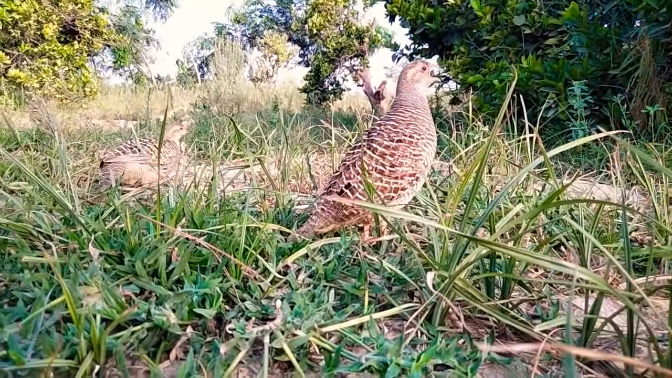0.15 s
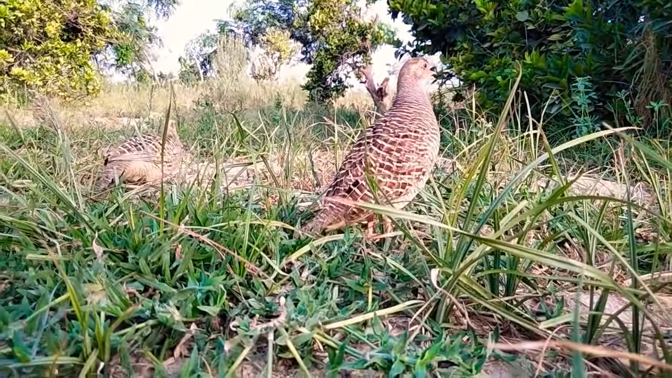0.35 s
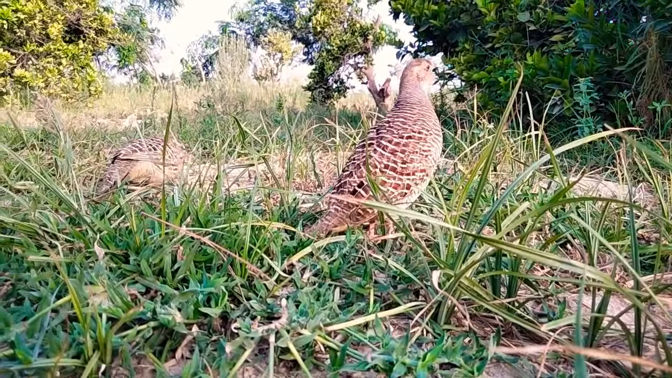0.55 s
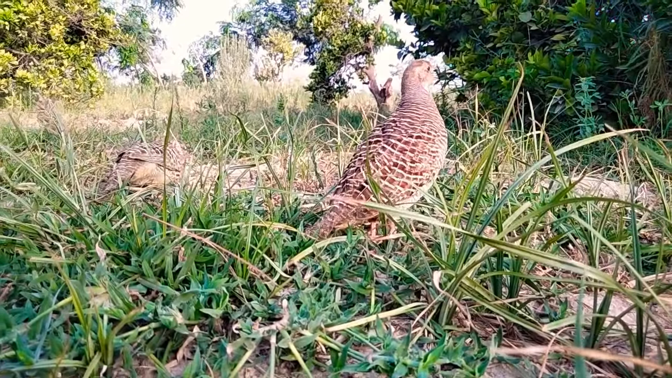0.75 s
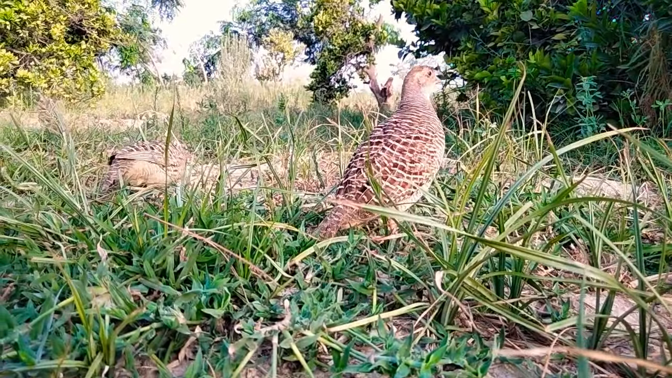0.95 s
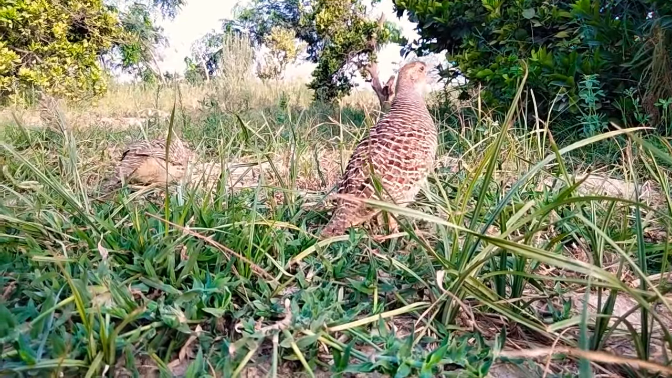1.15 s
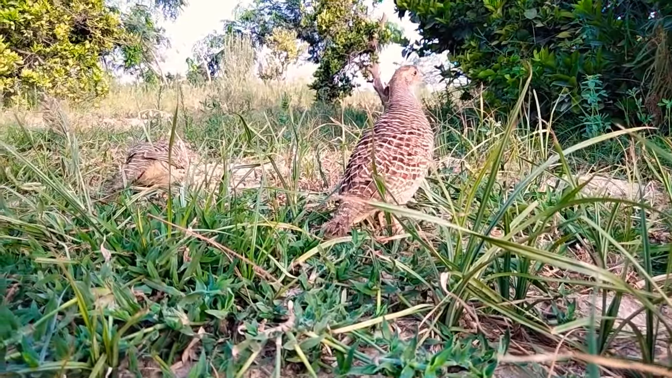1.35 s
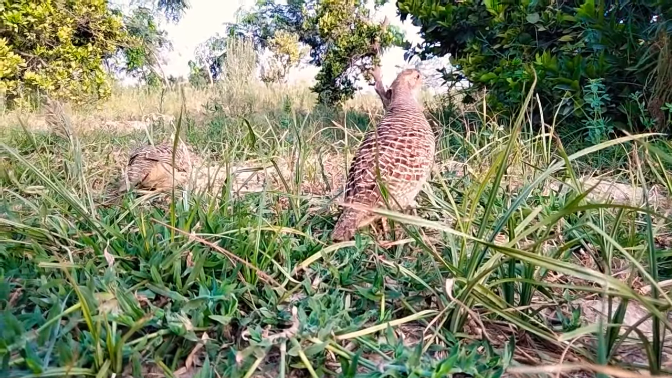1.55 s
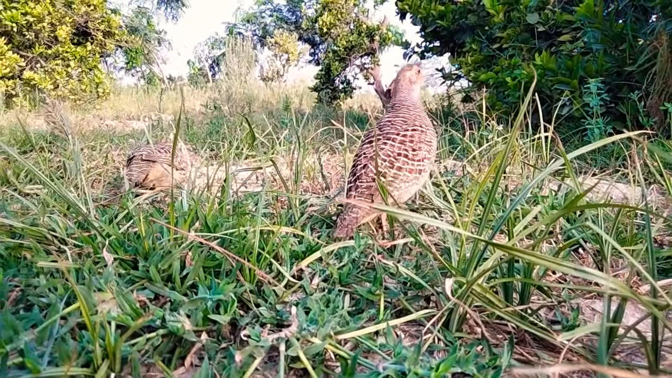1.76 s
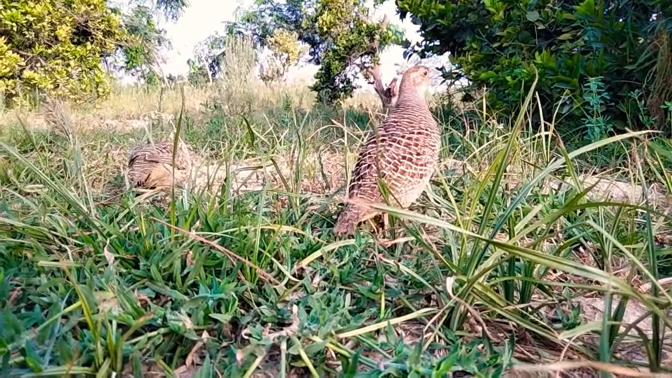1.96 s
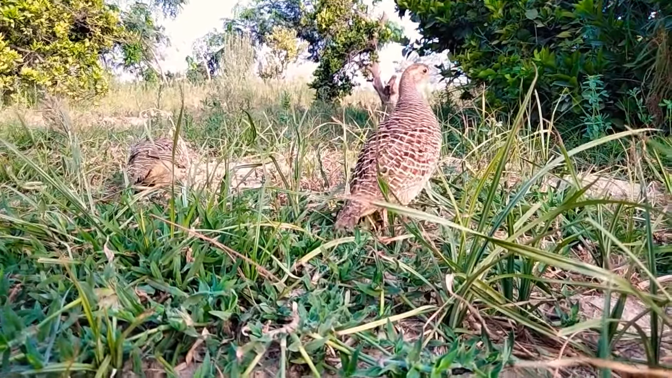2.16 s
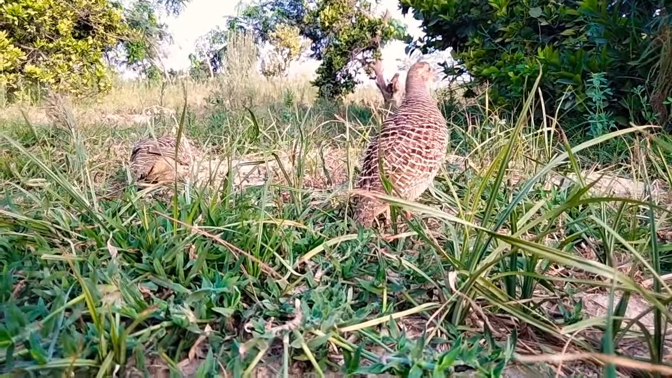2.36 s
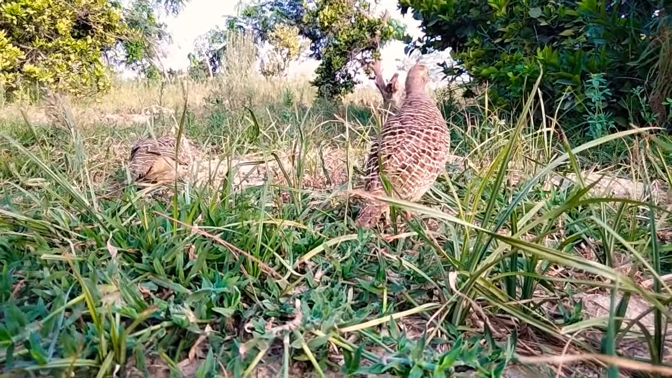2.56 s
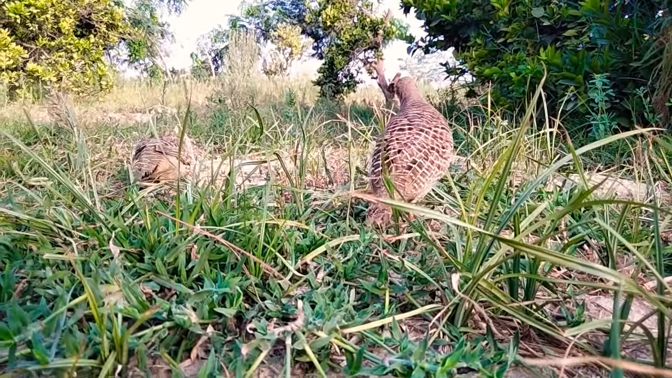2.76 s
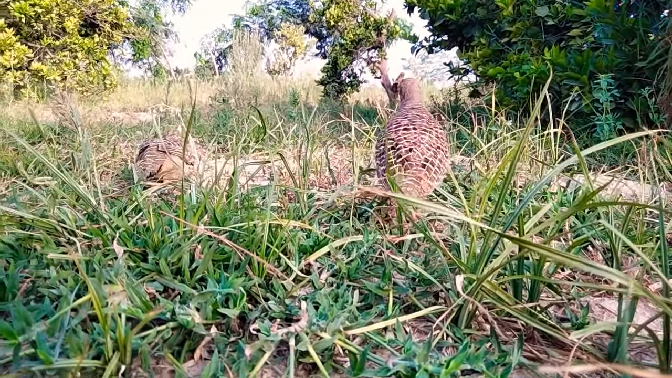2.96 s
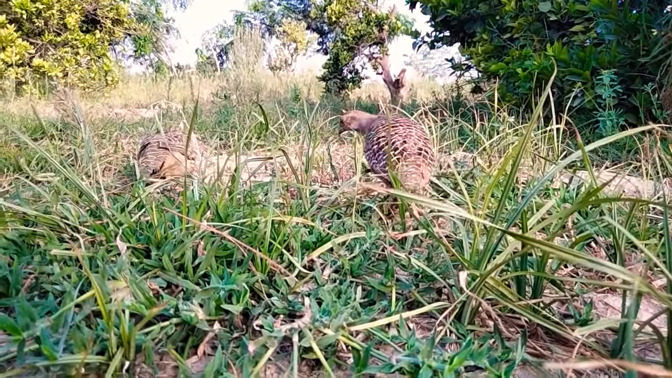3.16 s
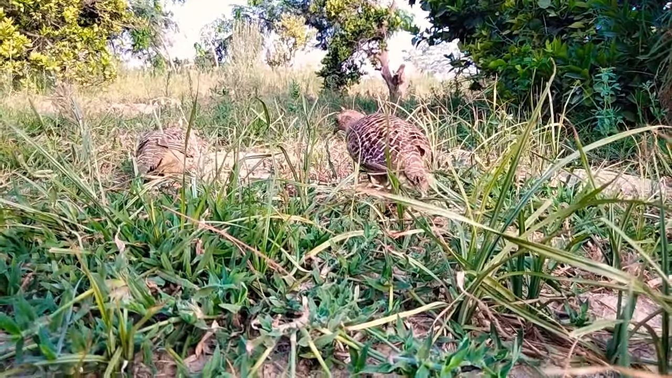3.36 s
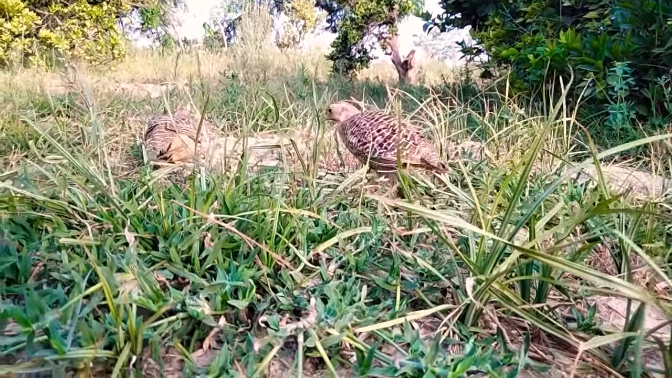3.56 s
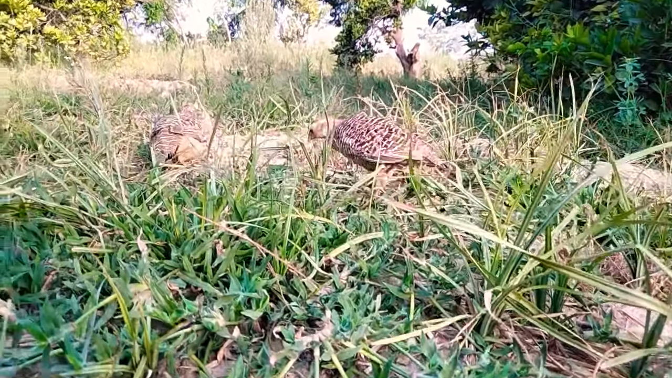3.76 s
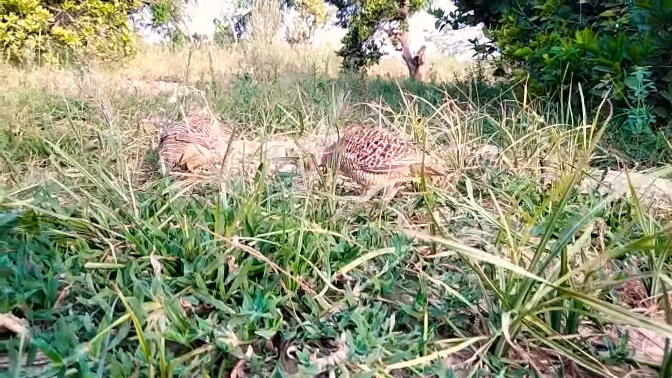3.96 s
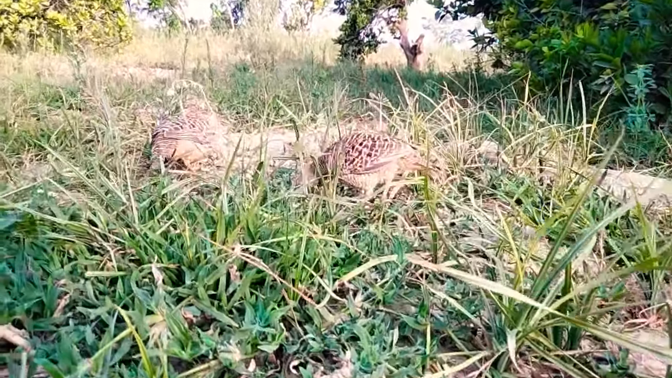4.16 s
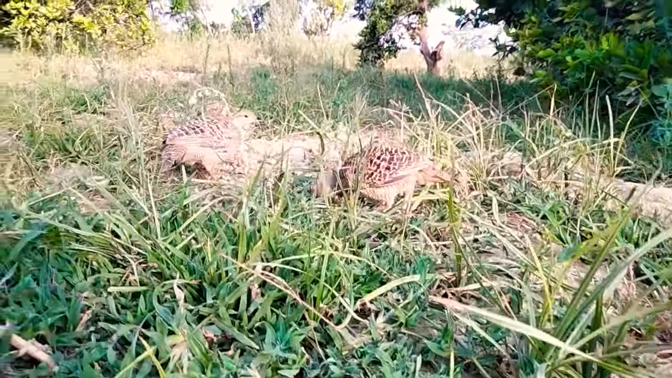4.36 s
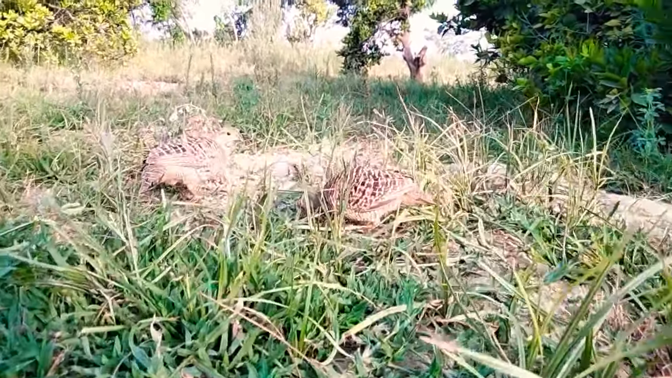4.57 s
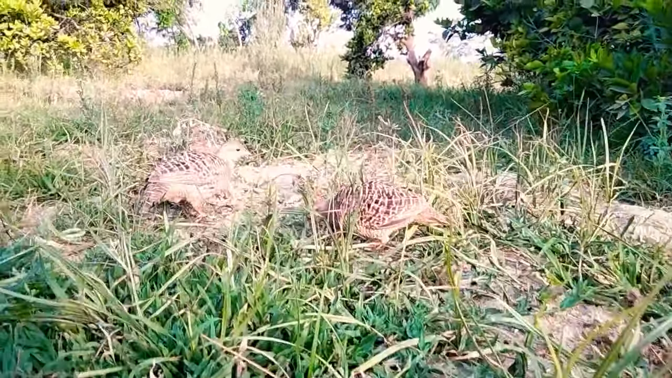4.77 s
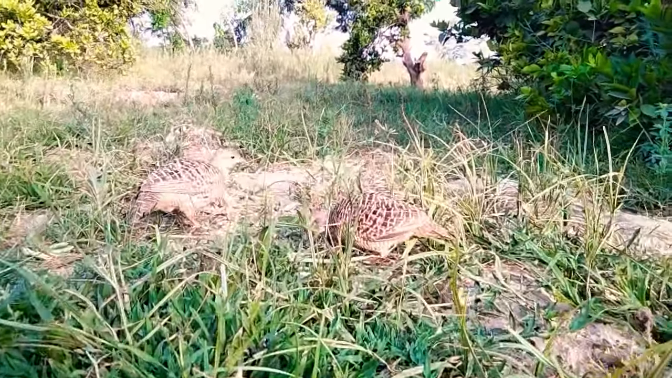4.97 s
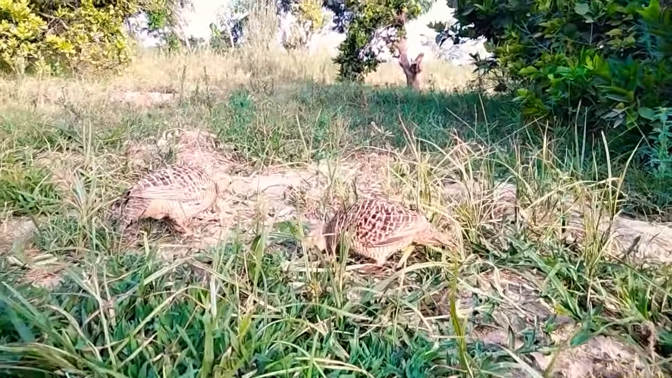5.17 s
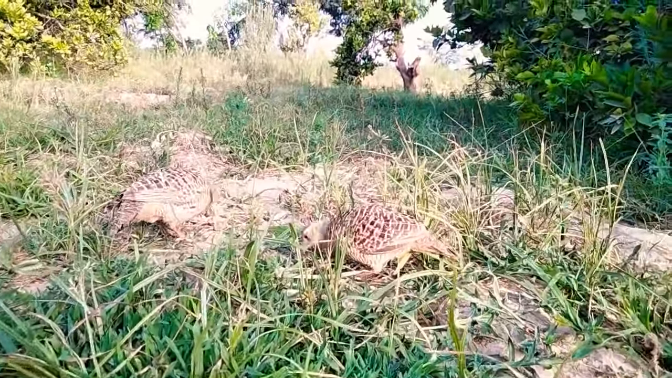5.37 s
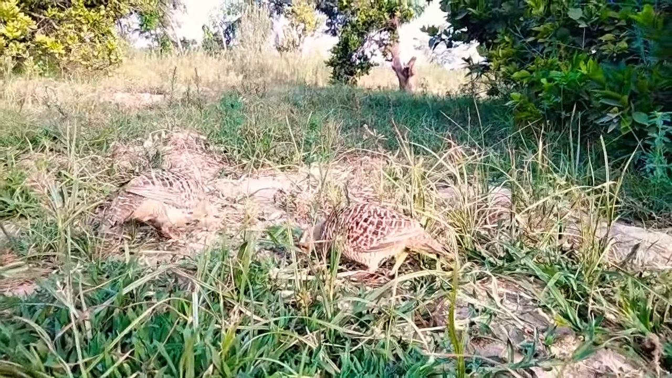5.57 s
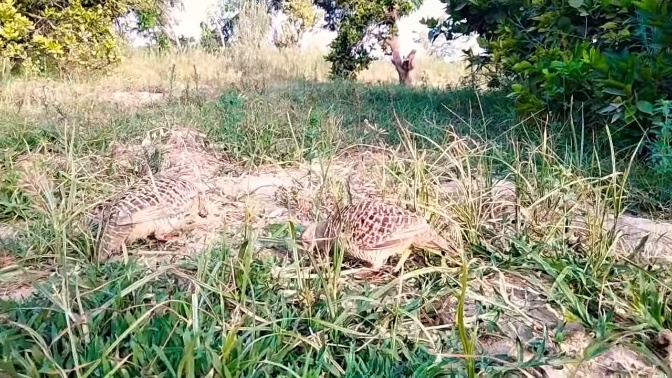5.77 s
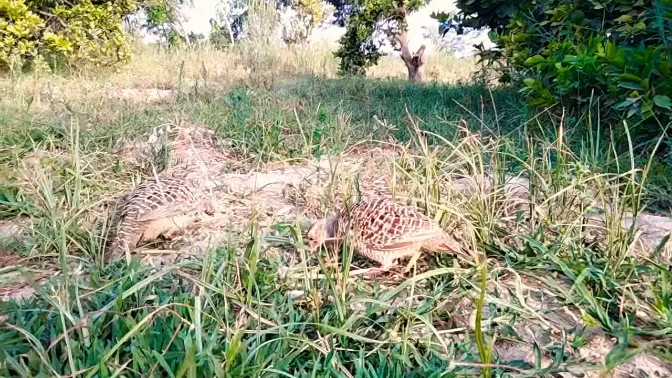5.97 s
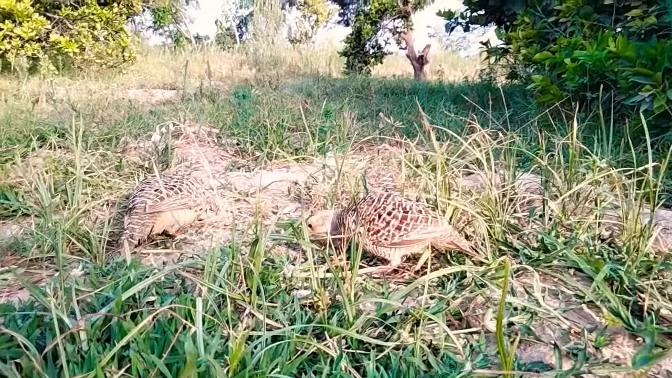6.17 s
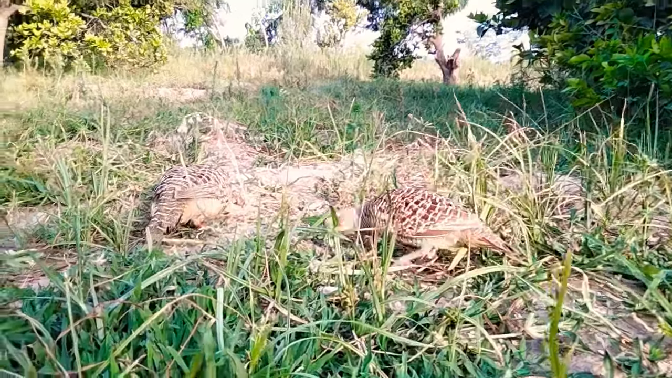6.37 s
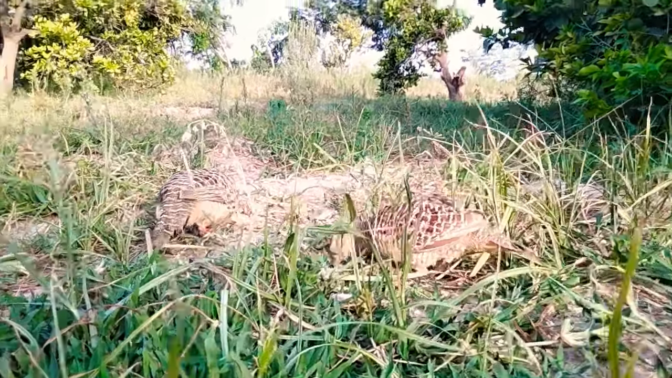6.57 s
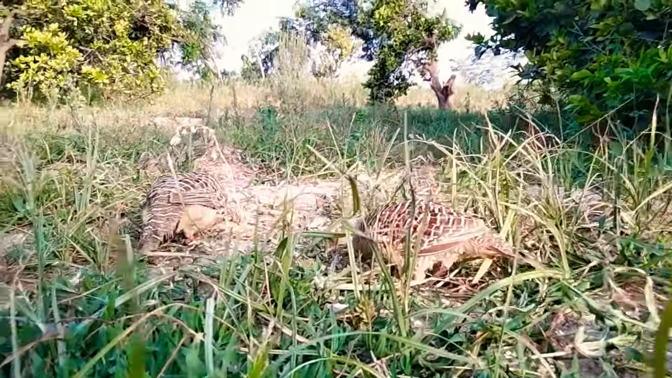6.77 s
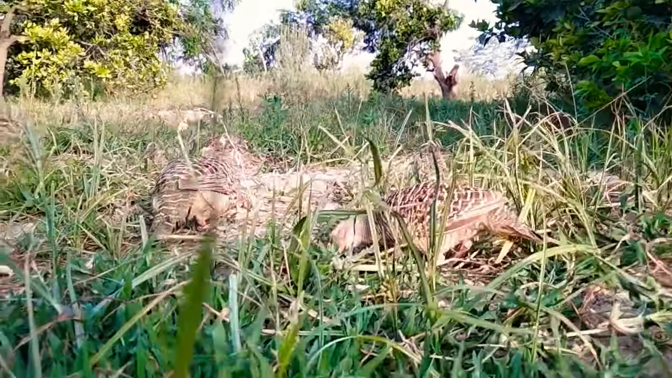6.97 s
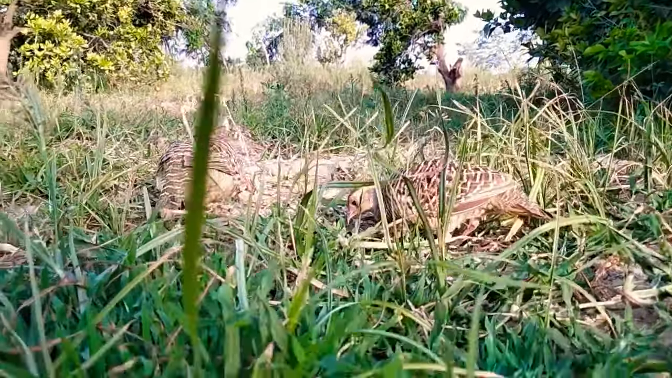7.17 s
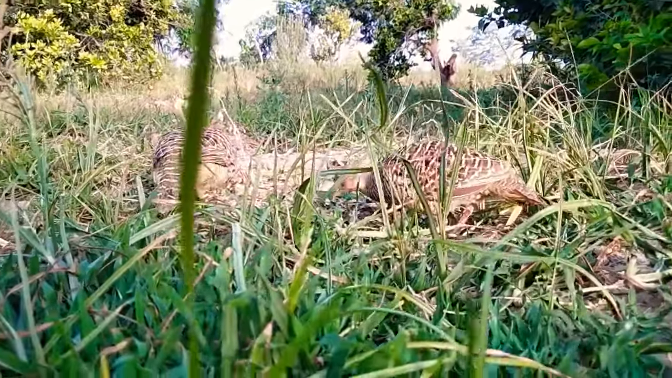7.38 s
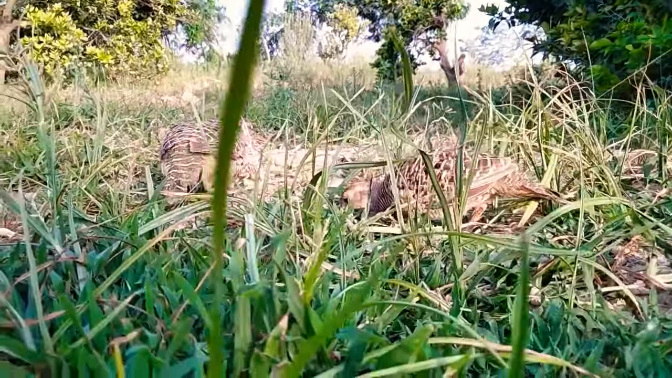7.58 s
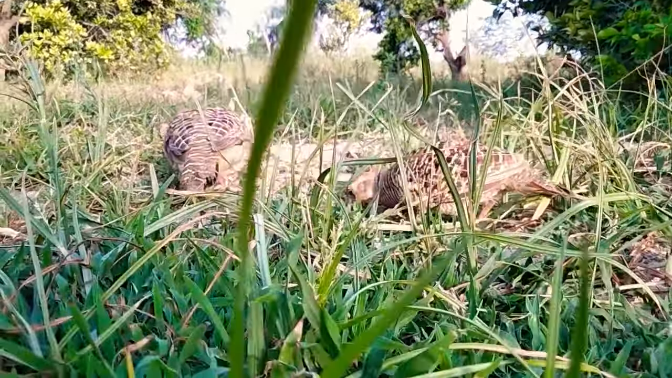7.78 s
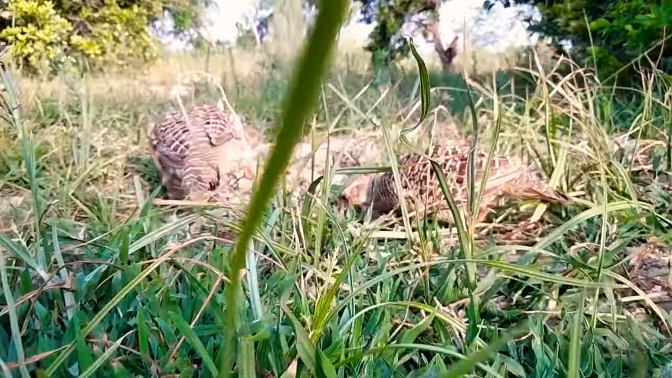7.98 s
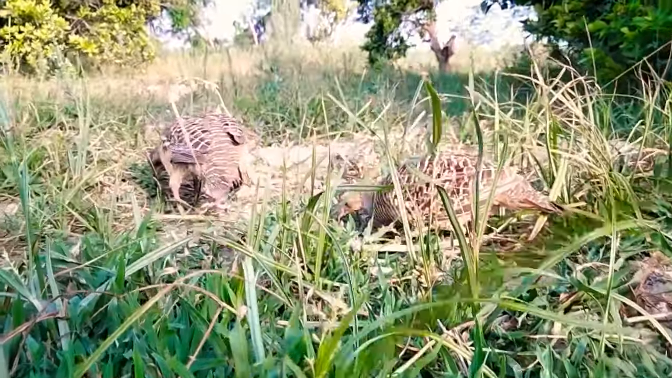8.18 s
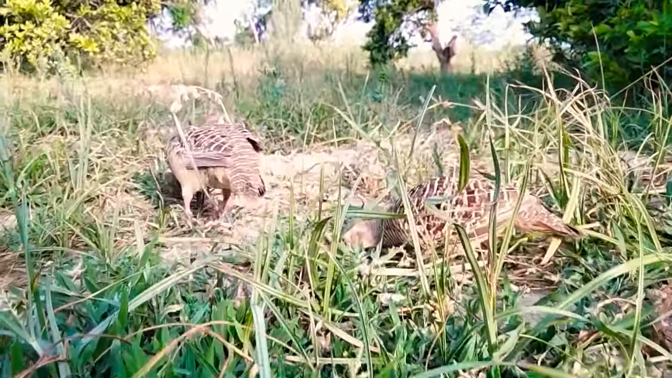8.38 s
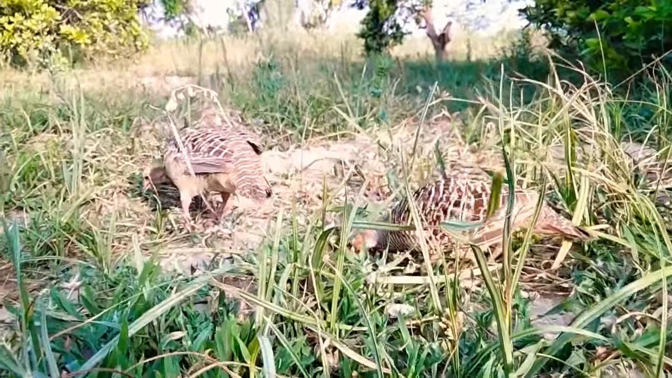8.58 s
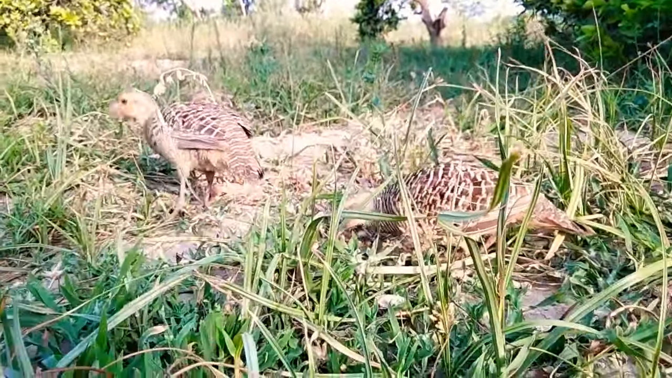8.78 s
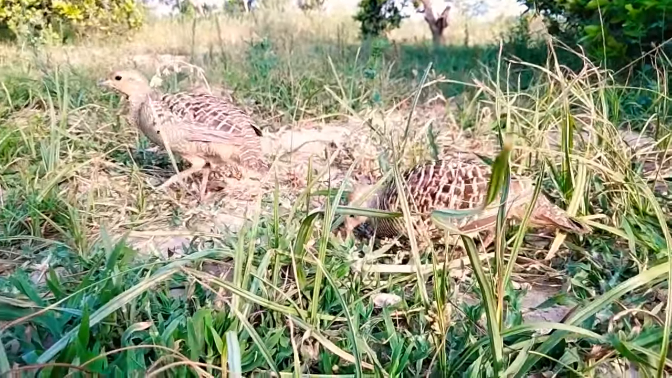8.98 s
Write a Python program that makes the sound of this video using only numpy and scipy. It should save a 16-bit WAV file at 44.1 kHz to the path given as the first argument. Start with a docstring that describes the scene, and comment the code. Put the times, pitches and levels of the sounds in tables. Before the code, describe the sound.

From 0 to about 2.5 s a close francolin calls eight times, very loud and harsh, roughly every 0.3 s with a longer gap before the last. Each call is a short rasp climbing into a piercing whistle near 2.4 kHz, a catch, then a lower arching syllable, whistled in the first three and rougher later; the calls gradually dull. From 2.6 s faint songbirds answer from the bushes with gliding whistles, reedy trills and twitters, well echoed. From 3.3 s grass brushes, stalks snap and an insect whirrs faintly; soft clucks begin at 3.6 s. Sharp peeps come at 4.5 and 6.2 s, buzz-and-slur phrases between 4.6 and 5.9 s. Dull hand bumps and clear whistles fall around 6.4 s, a low wavering croak at 7.1 s, a quick scratch at 8.4 s. Low distant rumble, swelling slightly after 3 s, and thin hiss run throughout.

```python
"""Eight harsh francolin calls in tall grass, close to a hand-held phone, over a low distant rumble and air hiss.
Each call is a rasp locking into a whistle, a catch, and an arching second syllable: pulses through a throat.
From 2.6 s songbirds sing in the bushes as gliding or buzzing tones; from 3.3 s grass and stalks tick and snap,
an insect whirrs and soft clucks begin. Peeps, hand bumps, a low croak and one foot scratch follow.
Birds are echoed by the bushes: near ones faintly, far ones strongly."""
import sys
import numpy as np
from scipy import signal
from scipy.fft import rfft, irfft
from scipy.io import wavfile

SR = 44100
rng = np.random.default_rng(int(sys.argv[2]) if len(sys.argv) > 2 else 0)


def digitize_waveform(pressure):
    """Quantize a signal to 16-bit integers and store it at the path in sys.argv[1].

    Rows of a 2-D input are taken as channels; values are limited to [-1, 1].
    """
    field = np.atleast_2d(pressure).T
    bounded = np.clip(field, -1, 1)
    quanta = np.round(bounded * 32767).astype(np.int16)
    wavfile.write(sys.argv[1], SR, quanta)


N = 397782

# rel_level_db: before the offset its function adds
# distant rumble: start_s, level_db
RUMBLE_LEVEL = [(0, -52.5), (2.3, -49), (3.1, -45), (7, -44), (9, -45.5)]
# rumble spectrum: freq_hz, gain_db
RUMBLE_SPECTRUM = [(15, -47), (25, -20.5), (74, -2), (97, 1), (135, -5), (184, -6), (221, -6.5), (260, -14),
                   (362, -19.5), (454, -28), (600, -42), (780, -68.5), (1320, -120)]
# open-air hiss spectrum: freq_hz, gain_db
AIR_SPECTRUM = [(290, -30), (500, -3.5), (1060, -13), (1720, -13.5), (4030, -20), (5710, -25),
                (6900, -15.5), (7860, -33), (9220, -17.5), (11000, -29.5), (15100, -26.5), (16000, -33)]
AIR_DB = -65.5
# loud calls: rasp_s, whistle_s, catch_s, second_s, whistle_hz, second_hz, second_rel_level_db
CALLS = [(-.003, .026, .073, .100, 2464, 805, -8), (.305, .329, .382, .410, 2425, 790, -9),
         (.618, .644, .696, .725, 2392, 775, -9.5), (.930, .955, 1.008, 1.034, 2384, 750, -12.5),
         (1.247, 1.273, 1.325, 1.352, 2383, 755, -12), (1.555, 1.581, 1.630, 1.657, 2385, 755, -12),
         (1.869, 1.902, 1.948, 1.972, 2327, 735, -12), (2.362, 2.412, 2.447, 2.481, 2235, 715, -11.5)]
WHISTLED_CALLS = 3  # first calls, with a whistled second syllable
# throat and beak, loud calls and peeps: freq_hz, gain_db
THROAT = [(400, -34), (700, -20), (1050, -13), (1400, -17), (1700, -17), (2050, -2), (2450, -2.5),
          (2850, -6.5), (3600, -1.5), (4600, -6.5), (5600, -24.5), (7000, -11), (8100, -25.5),
          (9400, -16.5), (10900, -34), (12300, -19.5), (13700, -40), (14800, -29.5), (16000, -35.5)]
RASP_DB, RASP_START_HZ, RASP_END_HZ, RASP_ATTACK_SHARE = -11, 585.4, 790, 0.34
WHISTLE_DB, WHISTLE_SAG_HZ, WHISTLE_SAG_S = -5, 212, .05
WHISTLE_ATTACK_S, WHISTLE_RELEASE_S = .005, .03
CATCH_DB, CATCH_START_HZ, CATCH_S = -13, 1123, 0.01
SECOND_S, SECOND_ATTACK_S, SECOND_CREST_S, SECOND_BREAK_S = .066, .009, .019, 0.042
# two microphone ports: freq_hz, left_minus_right_db, left_lead_rad
PORTS = [(100.1, 1.5, 1), (1260, -2, -1), (2100, -4, -1.5), (2500, -2.5, -1.08), (3100, 16.5, 1.7),
         (3310, -0.5, 1.5), (3900, -12, 2), (5635.6, -3.5, 2), (6383, -11, 1.8), (7000, -24, 2.4),
         (7500, -2.5, -1), (9450, 22.5, 2), (11777, -1.5, 9), (14870, -9, 7)]
# clear songbird whistles: start_s, length_s, pitch_hz, glide_octaves, level_db
WHISTLES = [(2.579, 0.11, 2042, -0.17, -57), (2.628, 0.041, 4320, -0.52, -55.5),
            (2.684, 0.13, 2300, -0.15, -53.5), (2.791, 0.13, 1673, -.47, -59.5),
            (6.345, 0.096, 2069, -0.011, -48.5), (6.441, 0.084, 2090, .08, -49),
            (6.542, 0.068, 2026, -0.564, -49), (8.523, 0.08, 2190, 0.023, -66)]
# reedy trills: start_s, length_s, rel_level_db
TRILLS = [(2.755, 0.13, -53), (3.267, 0.14, -50.5), (3.56, .15, -52.5), (3.858, 0.13, -49)]
# twitters: start_s, level_db
TWITTERS = [(3.01, -53.5), (4.15, -52)]
TWITTER_HZ, CHIP_GAP_S = 3610, .0265
# grass brushing: start_s, length_s, level_db
RUSTLES = [(3.25, 0.6224, -64), (4.479, 0.24, -59.5), (4.7, 0.21, -56), (5.633, 0.35, -60),
           (6.518, 0.28, -59.5), (7.044, 0.37, -75), (7.783, 0.091, -57.5), (8.121, 0.42, -59.5),
           (8.746, 0.24, -58)]
# dry stalks snapping: start_s, peak_rel_level_db, ring_hz
SNAPS = [(3.292, -40, 3600), (3.626, -36.5, 997), (3.943, -26, 1460), (4.512, -34, 2100),
         (6.03, -35.5, 9000), (6.203, -38, 5000), (6.618, -41, 1530), (7.319, -36, 6800),
         (7.529, -36, 3869), (7.68, -37, 4370), (7.852, -38, 1774), (8.265, -41.5, 3830)]
# stalk resonance: freq_hz, gain_db
STALK = [(400, -12), (1300, 9.5), (3000, -2), (4200, 4.5), (5500, -4.5), (7000, 6), (8200, -15), (9700, 10),
         (12000, -7), (16000, -6)]
# insect whirrs: start_s, length_s, level_db
WHIRRS = [(3.382, 0.39, -72), (8.45, 0.3211, -74)]
# soft clucks: start_s, length_s, pitch_hz, level_db
CLUCKS = [(3.606, 0.051, 1000, -44), (3.885, .05, 1130, -43.5), (4.202, 0.041, 1190, -48.5),
          (4.277, .05, 936, -44), (5.155, 0.0546, 1394, -54), (5.889, 0.051, 1010, -39),
          (6.227, .052, 1396, -53.5), (7.804, .058, 1656, -53.5), (8.681, .05, 1410, -53.5)]
# low dry churrs: start_s, length_s, level_db
CHURRS = [(4.305, 0.26, -59), (4.741, 0.27, -55.5), (8.749, 0.195, -68)]
CHURR_HZ = 1830
# sharp peeps: start_s, length_s, pitch_hz, level_db, roughness (0-1)
PEEPS = [(4.528, 0.037, 2090, -36, .1), (6.192, .037, 2360, -43, 0.36)]
# buzz-and-slur phrases: buzz_s, slur_s, rel_level_db
PHRASES = [(4.592, 4.709, -61), (4.975, 5.109, -59), (5.344, 5.463, -59), (5.688, 5.823, -59)]
# hand bumps: start_s, length_s, rel_level_db
BUMPS = [(6.341, 0.046, -33), (6.493, 0.051, -39.5), (8.806, 0.12, -49)]
# litter scratch spectrum: freq_hz, gain_db
SCRATCH_SPECTRUM = [(180, -42), (300, -3.5), (1100, -9.5), (1340, -2), (1810, -12.5), (2520, -7),
                    (3640, -16), (6850, -9.5), (8640, -35.5), (10400, -29), (16000, -26.5)]
TOP_HZ = 15900


def undb(db):
    """Decibels to gain."""
    return 10 ** (np.asarray(db) / 20)


def unit(x):
    """Scale to rms 1."""
    return x / np.sqrt(np.mean(x ** 2) + 1e-18)


def read(points, hz, axis=1):
    """Column of a spectrum table, interpolated over log frequency."""
    points = np.array(points, float)
    return np.interp(np.log(hz + 1), np.log(points[:, 0] + 1), points[:, axis])


def colour(x, points):
    """Filter by a (freq_hz, gain_db) spectrum; rms 1."""
    n = x.shape[-1]
    gain_db = read(points, np.arange(n // 2 + 1) * SR / n)
    return unit(irfft(rfft(x) * undb(gain_db), n))


def walk(n, rate_hz):
    """Random values at rate_hz, joined by straight lines."""
    steps = np.arange(n) * rate_hz / SR
    return np.interp(steps, np.arange(n), rng.standard_normal(n))


def add(out, x, start_s):
    """Mix x in at start_s."""
    i = int(start_s * SR)
    x = x[..., max(-i, 0):N - i]
    out[..., max(i, 0):max(i, 0) + x.shape[-1]] += x


def pan(left_minus_right_db):
    """Left and right gains."""
    return undb(np.array([[left_minus_right_db], [-left_minus_right_db]]) / 2)


def clock(length_s):
    """Seconds since the start of a note."""
    return np.arange(int(length_s * SR)) / SR


def ramp(t, start, length):
    """Rise from 0 to 1 over length, beginning at start."""
    return np.clip((t - start) / length, 0, 1)


def background(side_db=-9):
    """Low-passed noise rumble, nearly alike on both sides, under faint wavering open-air hiss."""
    mid, side = colour(rng.standard_normal((2, N)), RUMBLE_SPECTRUM)
    level_db = np.interp(np.arange(N) / SR, *np.transpose(RUMBLE_LEVEL))
    rumble = (mid + undb(side_db) * side * np.array([[1], [-1]])) * undb(level_db)
    air_db = AIR_DB + .7 * walk(N, 11.0) + 0.95 * walk(N, 1.5)
    return rumble + colour(rng.standard_normal((2, N)), AIR_SPECTRUM) * undb(air_db)


def syllable(pitch_hz, ratio, db, lock, rough, throat, purity_db, order=2, focus_hz=2350,
             locked_top_hz=20000, jitter=0.084, hiss=1.0, top_db=0, flicker_db=5):
    """Syrinx pulses through the throat; locking favours every order-th harmonic and those near the focus."""
    n = len(ratio)
    u = np.linspace(0, 1, n)
    lock, rough = np.clip(lock, 0, 1), np.clip(rough, 0, 1)
    hz = pitch_hz * ratio * (1 + jitter * rough * walk(n, 1600) + 0.0015 * walk(n, 150))
    phase = 2 * np.pi * np.cumsum(hz) / SR
    k = np.arange(1, 17)[:, None]
    partial_hz = k * hz
    # top_db tilts the treble: a softer push gives less
    throat = [(f, d + top_db * np.clip((f - 4000) / 3000, 0, 1)) for f, d in throat]
    favour = .6 * (k % order == 0) / (1 + (partial_hz / locked_top_hz) ** 10)
    favour = favour + 0.73 * np.exp(-((partial_hz - focus_hz) / 650) ** 2)
    # high harmonics outside the locked set sink into the hiss; rough ones flicker
    sink_db = -10 * (k % order != 0) * np.clip((partial_hz - 4000) / 2000, 0, 1)
    sink_db = sink_db - 1.2 * np.maximum(k - 9, 0)
    flicker = flicker_db * rough * np.array([walk(n, 350) for _ in k])
    # as pitch sags late in a note, upper harmonics and hiss die first
    sag = np.clip(1 - ratio, 0, 1) * np.clip(4 * u - 2, 0, 1)
    sink_db = sink_db - 30 * sag * np.maximum(np.log2(partial_hz / 1900), 0)
    size = undb(read(throat, partial_hz) + purity_db * lock * favour + sink_db + flicker)
    size = size * (partial_hz < SR / 2)
    # the throat delays each harmonic differently, spreading the pulse over its cycle
    harmonics = size * np.sin(k * phase + rng.uniform(0, 2 * np.pi, k.shape))
    tone = np.sum(harmonics, axis=0) / np.sqrt(np.sum(size ** 2, axis=0) / 2)
    pulsed_noise = rng.standard_normal(n) * (1 + 0.53 * np.cos(phase))
    air = colour(pulsed_noise, throat) * undb(-22 * sag)
    voice = (tone + hiss * rough * air) / np.sqrt(1 + (hiss * rough) ** 2)
    edges = np.clip(np.minimum(u, 1 - u) * n / SR / 0.0021, 0, 1)
    return voice * undb(db + 4.4 * rough * walk(n, 250)) * edges


def rasp(length_s, focus_hz, top_db):
    """Rough onset, climbing as pressure builds, more orderly as it nears the whistle."""
    t = clock(length_s + 0.0022)
    u = t / t[-1]
    ratio = (RASP_END_HZ / RASP_START_HZ) ** u
    db = RASP_DB - 20 * (1 - ramp(u, 0, RASP_ATTACK_SHARE)) ** 2
    rough = .75 - .4 * ramp(t, .003, .016)
    return syllable(RASP_START_HZ, ratio, db, 0.13 + .45 * u, rough, THROAT, purity_db=19.5,
                    locked_top_hz=4600, focus_hz=focus_hz, top_db=top_db + 2.5)


def whistle(length_s, pitch_hz, top_db):
    """Membranes lock on the second harmonic; as pressure runs out pitch sags and half tones creep back."""
    t = clock(length_s + 0.0017)
    onset = 1 - ramp(t, 0, WHISTLE_ATTACK_S)
    fade = np.sin(np.pi / 2 * ramp(t, length_s - WHISTLE_RELEASE_S, WHISTLE_RELEASE_S)) ** 2
    sag = np.exp(-t / WHISTLE_SAG_S)
    ratio = 1 + WHISTLE_SAG_HZ * (sag - sag.mean()) / pitch_hz
    db = WHISTLE_DB - 4.2 * onset - 1.2 * sag ** 3 - 9 * fade ** 1.8
    lock = 1 - .4 * onset - 0.42 * fade
    rough = .018 + 0.21 * onset + 0.1 * fade ** 4
    return syllable(pitch_hz / 2, ratio, db, lock, rough, THROAT, purity_db=25.5, top_db=top_db + 1)


def catch(top_db):
    """Short rough squawk: the whistle breaks up, drops and dies."""
    u = clock(CATCH_S + 0.0024) / CATCH_S
    return syllable(CATCH_START_HZ, 1 - 0.27 * u, CATCH_DB - 15 * u ** 2, .9 - .6 * u, .3 + .35 * u,
                    THROAT, purity_db=10, top_db=top_db - 8)


def second_syllable(pitch_hz, fade_db, break_db, rough, creak_rough, purity_db, focus_hz, locked_top_hz,
                    top_db, order, climb=.3, sink=.28, collapse=.36):
    """Pitch arch: rough on the way up, locked over the crest, collapsing into a low creak."""
    t = clock(SECOND_S)
    rise = ramp(t, 0, SECOND_CREST_S)
    fall = ramp(t, SECOND_CREST_S, SECOND_S - SECOND_CREST_S)
    broken = ramp(t, SECOND_BREAK_S, .005)
    creak = ramp(t, SECOND_BREAK_S, SECOND_S - SECOND_BREAK_S)
    locked = ramp(t, .006, .014)
    ratio = np.maximum(1 - climb * (1 - rise) ** 1.7 - sink * fall - collapse * fall ** 4, .2)
    attack_db = -24 * (1 - ramp(t, 0, SECOND_ATTACK_S))
    db = attack_db + fade_db * fall + break_db * broken - 13 * creak ** 2
    lock = (0.14 + 1.1 * locked) * (1 - creak_rough * broken)
    roughness = rough + .5 * (1 - locked) + creak_rough * broken
    # the strongest partial drops as the creak sets in
    return syllable(pitch_hz, ratio, db, lock, roughness, THROAT, purity_db, order=order,
                    focus_hz=focus_hz * (1 - 0.87 * creak), locked_top_hz=locked_top_hz, top_db=top_db)


def beak_hiss(level_db=-46, centre_hz=9600):
    """Thin high noise that swells and fades as the second syllable sinks."""
    n = len(clock(SECOND_S))
    band = [(centre_hz * 0.82, -30), (centre_hz * 1.0, -4), (centre_hz, 0),
            (centre_hz * 0.84, -13), (centre_hz * 1.6, -20)]
    return undb(level_db) * colour(rng.standard_normal(n), band) * np.hanning(n)


def francolin(tiring_db=-1.39, loosening_db=-2, rasp_focus_hz=3450, focus_step_hz=-95):
    """Rasp, whistle, catch, second syllable (whistled at first, harsh later); each call a little duller."""
    out = np.zeros(N)
    for i, (rasp_s, whistle_s, catch_s, second_s, whistle_hz, second_hz, second_db) in enumerate(CALLS):
        top_db = 4.5 + tiring_db * i
        add(out, rasp(whistle_s - rasp_s, rasp_focus_hz + focus_step_hz * i, top_db), rasp_s)
        add(out, whistle(catch_s - whistle_s, whistle_hz, top_db), whistle_s)
        add(out, catch(top_db), catch_s - .001)
        if i < WHISTLED_CALLS:
            note = second_syllable(second_hz, fade_db=-0.25, break_db=-15.5, rough=0.029, creak_rough=.55,
                                   purity_db=27 + loosening_db * i, focus_hz=2190, locked_top_hz=11000,
                                   top_db=top_db - 5, order=3)
        else:
            note = second_syllable(second_hz, fade_db=-6.5, break_db=-4.0, rough=0.12, creak_rough=.16,
                                   purity_db=15, focus_hz=2600, locked_top_hz=4755,
                                   top_db=top_db - 6.5, order=2)
        add(out, undb(second_db) * note, second_s)
        add(out, beak_hiss(), second_s + 0.0099)
    return out


def ports(x):
    """A close source reaches the two ports with different colour and phase."""
    hz = np.arange(N // 2 + 1) * SR / N
    halves = np.array([[.5], [-.5]])
    gains = undb(read(PORTS, hz) * halves)
    gains = gains / np.sqrt(np.mean(gains ** 2, axis=0))
    turn = np.exp(1j * read(PORTS, hz, axis=2) * halves)
    return irfft(rfft(x) * gains * turn, N)


def bushes(x, early_db, late_db, early_t60_s=.11, late_t60_s=0.45):
    """Leaves scatter a short dense echo; trees further off return a faint, duller one."""
    t = np.arange(SR) / SR
    rise = 1 - np.exp(-(t / 0.0076) ** 2)
    leaves = [(500, -3.0), (2300, -0.5), (4500, -6.0), (9500, 0), (16000, -13.5)]
    trees = [(500, -14.0), (2100, -2.0), (3500, -9.0), (7000, -2.5), (16000, -24)]
    early = colour(rng.standard_normal((2, SR)), leaves) * undb(-60 * t / early_t60_s)
    late = colour(rng.standard_normal((2, SR)), trees) * undb(-60 * t / late_t60_s)
    echo = undb(early_db) * unit(early * rise) + undb(late_db) * unit(late * rise)
    return signal.fftconvolve(x, echo / np.sqrt(SR), axes=1)[:, :N]


def chirp(length_s, start_hz, middle_hz, end_hz, buzz, buzz_hz=125, scatter=0.78):
    """Gliding whistle; fast uneven pitch flutter turns it into a buzz."""
    n = int(length_s * SR)
    u = np.linspace(0, 1, n)
    hz = np.polyval(np.polyfit([0, .5, 1], [start_hz, middle_hz, end_hz], 2), u)
    flutter = np.sin(2 * np.pi * np.cumsum(buzz_hz * (1 + 0.139 * walk(n, 63.14))) / SR)
    phase = 2 * np.pi * np.cumsum(hz * (1 + buzz * (flutter + scatter * walk(n, 1700)))) / SR
    envelope = np.abs(np.sin(np.pi * u ** 0.7594)) ** 0.33
    return unit(np.sin(phase)) * envelope * undb(2.5 * walk(n, 127.0))


def glide(length_s, hz, octaves, buzz, arch=0.0474):
    """Slightly arched note sliding through its middle pitch."""
    edge_hz = hz * (1 - arch)
    return chirp(length_s, edge_hz * 2 ** (-octaves / 2), hz, edge_hz * 2 ** (octaves / 2), buzz)


def bird_whistles():
    """Clear songbird notes: gliding tones with little flutter."""
    out = np.zeros((2, N))
    for s, length_s, hz, octaves, db in WHISTLES:
        add(out, pan(-2.1) * undb(db) * glide(length_s, hz, octaves, buzz=0.032), s)
    return out


def distant_song(count=10, start_s=2.6, level_db=-71, pitch_hz=3100):
    """Faint stray gliding notes from birds further off, random in time, pitch and side."""
    out = np.zeros((2, N))
    for when, high, slope, side in rng.uniform(-1, 1, (count, 4)):
        note = glide(0.065, pitch_hz * 2 ** (0.53 * high), 0.14 * slope - .1, buzz=.025)
        add(out, pan(4 * side) * undb(level_db) * note, start_s + 2 * (when + 1))
    return out


def trill(length_s, pitch_hz=925, climb_per_s=0.85, pulse_hz=64, sweep=0.13):
    """Slowly rising reedy note cut into quick pulses, each a little upward sweep."""
    reed = [(1000, -33.0), (1900, -5), (2800, -22), (3700, 5), (4600, -2), (5500, -11.5),
            (6500, -13), (12000, -46.5)]
    t = clock(length_s)
    cycle = np.cumsum(pulse_hz * (1 + .08 * walk(len(t), 40.4))) / SR % 1
    ratio = .96 + climb_per_s * t + sweep * (cycle - .5)
    db = -10 * (1 - ramp(t, 0, 0.016)) - 11 * np.cos(np.pi * cycle) ** 2
    return syllable(pitch_hz, ratio, db, 0, 0.31, reed, purity_db=0)


def trills():
    """Reedy pulsed notes, each closed by three short falling tones."""
    out = np.zeros((2, N))
    for s, length_s, db in TRILLS:
        add(out, pan(-14) * undb(db - 4.5) * trill(length_s - .012), s)
        for after_s, hz in ((-.014, 4150), (.012, 2900), (.04, 2600)):
            note = glide(0.01, hz, -0.67, buzz=0.146)
            add(out, pan(-7.0) * undb(db - 8) * note, s + length_s + after_s)
    return out


def twitter(count=3):
    """Level note, quick falling chips with a partial above and below, closing slur."""
    out = np.zeros(N)
    add(out, undb(-1) * glide(0.031, TWITTER_HZ, 0, buzz=.012), 0)
    for i in range(1, count + 1):
        for harmonic, db in ((2, -6.5), (3, -5), (4, -8)):
            chip = glide(0.0154, harmonic * 1090, -0.23, buzz=0.038)
            add(out, undb(db) * chip, .004 + i * CHIP_GAP_S)
    add(out, undb(1.0) * glide(0.038, 2550, -0.77, buzz=0.054), (count + 1) * CHIP_GAP_S)
    return out[:SR // 4]


def twitters():
    """Quick runs of gliding tones."""
    out = np.zeros((2, N))
    for s, db in TWITTERS:
        add(out, pan(-5.17) * undb(db) * twitter(), s)
    return out


def grass_rustles(grain_db=7.0):
    """Blades brush in dense tiny ticks: noise with a fast random level."""
    out = np.zeros((2, N))
    blades = [(1000, -2.0), (4000, -3), (5500, -6.5), (7000, 4), (8200, -10), (9700, 2.0),
              (11500, -8.0), (16000, -1.5)]
    for s, length_s, db in RUSTLES:
        n = int(length_s * SR)
        ticks = rng.standard_normal((2, n)) * undb(grain_db * walk(n, 480))
        add(out, undb(db) * colour(ticks, blades) * np.hanning(n) ** .5, s)
    return out


def stalk_snaps(decay_s=0.0015, snap_db=1):
    """Dry stalks snap: fast-decaying noise through the stalk resonance, tilted towards ring_hz."""
    out = np.zeros((2, N))
    t = np.arange(SR // 20) / SR
    for s, db, ring_hz in SNAPS:
        ring = [(f, d - 5 * abs(np.log2(f / ring_hz))) for f, d in STALK]
        snap = colour(rng.standard_normal((2, len(t))), ring) * np.exp(-t / decay_s)
        add(out, pan(-0.5) * undb(db + snap_db) * snap / np.abs(snap).max(), s)
    return out


def throb(x, rate_hz, depth):
    """Chop a sound into quick, slightly uneven pulses."""
    uneven_hz = rate_hz * (1 + 0.11 * walk(len(x), 44.0))
    return x * (1 + depth * np.sin(2 * np.pi * np.cumsum(uneven_hz) / SR))


def insect_whirrs():
    """Insect: band-limited noise, pulsed."""
    out = np.zeros((2, N))
    for s, length_s, db in WHIRRS:
        n = int(length_s * SR)
        whirr = colour(rng.standard_normal(n), [(3500, -44), (5300, 1), (6700, 4.0), (8500, -36)])
        add(out, undb(db) * throb(whirr * np.hanning(n) ** .5, rate_hz=47, depth=1.0), s)
    return out


def clucks(flick_s=.011):
    """Quiet closed-beak contact calls that sink, then flick up in pitch."""
    out = np.zeros(N)
    closed_beak = [(500, -16.0), (1000, -3.5), (1550, -5.5), (2100, -14), (3300, -23.0),
                   (5000, -31), (12000, -54)]
    for s, length_s, hz, db in CLUCKS:
        t = clock(length_s + .002)
        u, flick = t / length_s, ramp(t, length_s - flick_s, flick_s)
        ratio = 1.09 - 0.2 * u + 0.49 * flick
        swell_db = 3.5 - 19 * (1 - u) ** 4 - 11 * flick
        note = syllable(hz, ratio, swell_db, 1 - flick, 0.054 + 0.31 * flick, closed_beak,
                        purity_db=8.5, order=1, focus_hz=hz, jitter=.199)
        add(out, undb(db) * note, s)
    return out


def churrs():
    """Long, nearly level notes roughened by pitch flutter."""
    out = np.zeros((2, N))
    for s, length_s, db in CHURRS:
        note = glide(length_s, CHURR_HZ, -0.029, buzz=0.092, arch=0.0053)
        add(out, pan(-0.93) * undb(db) * note, s)
    return out


def peeps():
    """Short sharp syrinx notes from the ground, locked and sinking."""
    out = np.zeros(N)
    for s, length_s, hz, db, rough in PEEPS:
        u = clock(length_s) / length_s
        fade_db = -8 * u ** 2 - 12 * (1 - u) ** 8
        note = syllable(hz, 1 - 0.14 * u ** 2, fade_db, 0.98, rough, THROAT, purity_db=30 * rough,
                        order=1, locked_top_hz=3300, top_db=-7)
        add(out, undb(db) * note, s)
    return out


def phrases():
    """Repeated rising buzz, then a downward slur."""
    out = np.zeros((2, N))
    for s, slur_s, db in PHRASES:
        buzz = chirp(slur_s - s - .01, 2200, 2620, 2750, buzz=0.11)
        add(out, pan(1) * undb(db) * buzz, s)
        slur = chirp(0.062, 3650, 2500, 1896.0, buzz=0.054)
        # the high start of the slur carries its octave
        octave = colour(slur ** 2, [(2500, -69), (5500, -12), (7000, -1)]) * np.linspace(1, 0, len(slur))
        add(out, pan(1.4) * undb(db + 5) * (slur + undb(-13) * octave), slur_s)
    return out


def hand_bumps():
    """Dull bumps of the hand on the phone: short low thuds of noise."""
    out = np.zeros((2, N))
    for s, length_s, db in BUMPS:
        n = int(length_s * SR)
        body = [(20, -22), (50, -1.0), (120, -2.0), (220, -36.0), (600, -87.0)]
        thud = colour(rng.standard_normal(n), body)
        add(out, pan(16.5) * undb(db - 1.5) * unit(thud * np.hanning(n)), s)
    return out


def croak(start_s=7.12, pitch_hz=745, waver_hz=9.4):
    """One low wavering syrinx note, rough wherever its pitch dips."""
    out = np.zeros(N)
    chest = [(250, -30.5), (550, -1), (900, -2.5), (1500, -1.5), (2300, -25), (4500, -26.5), (12000, -39.0)]
    t = clock(.152)
    ratio = (1 - 1.3 * t) * (1 + 0.21 * np.cos(2 * np.pi * waver_hz * t))
    slack = np.clip((1.05 - ratio) / 0.41, 0, 1)
    db = -41.5 - 21 * (1 - ramp(t, 0, 0.021)) + 7 * slack - 40 * t
    note = syllable(pitch_hz, ratio, db, 1 - slack, 0.055 + 1.4 * slack, chest, purity_db=22, order=1,
                    focus_hz=748, jitter=.113, hiss=1.29)
    add(out, note, start_s)
    return out


def foot_scratch():
    """One quick scratch in the litter: noise with a sharp peak and a longer faint skirt."""
    out = np.zeros((2, N))
    t = np.arange(SR // 20) / SR
    envelope = np.exp(-np.abs(t - .015) / 0.0034) + 0.1456 * np.exp(-np.abs(t - .02) / 0.02074)
    scratch = colour(rng.standard_normal((2, len(t))), SCRATCH_SPECTRUM) * envelope
    add(out, pan(-24.5) * undb(-38.5) * scratch, 8.35)
    return out


def scene():
    """Near birds nearly dry, far singers with more echo, grass and background without."""
    near = ports(francolin() + clucks() + peeps() + croak())
    far = bird_whistles() + distant_song() + trills() + twitters()
    far += insect_whirrs() + churrs() + phrases()
    echoes = bushes(near, early_db=-23.5, late_db=-45.5) + bushes(far, early_db=-7.5, late_db=-10.5)
    grass = grass_rustles() + stalk_snaps() + foot_scratch()
    return near + far + echoes + grass + background() + hand_bumps()


def record(dry, ceiling=0.904):
    """The phone rounds off the highest peaks and cuts the top."""
    rounded = dry / (1 + np.abs(dry / ceiling) ** 8) ** (1 / 8)
    low_pass = signal.ellip(10, .2, 80, TOP_HZ, fs=SR, output="sos")
    return signal.sosfilt(low_pass, rounded)


dry = scene()
out = record(dry)
digitize_waveform(out)
```